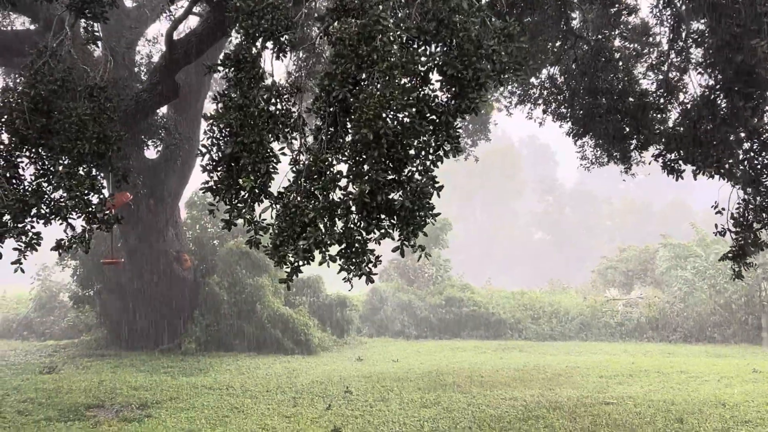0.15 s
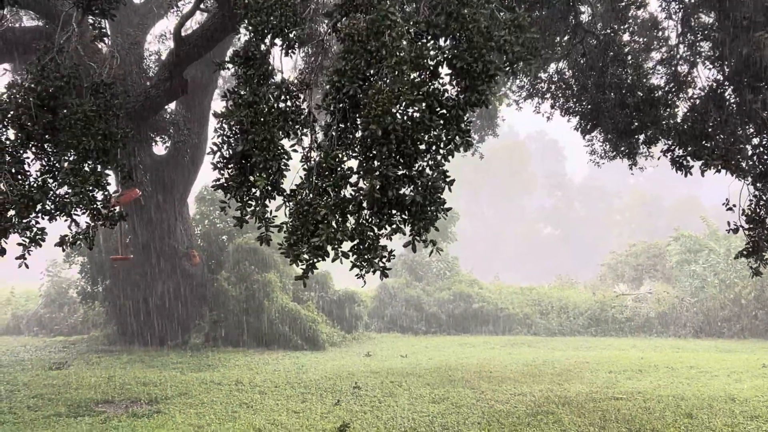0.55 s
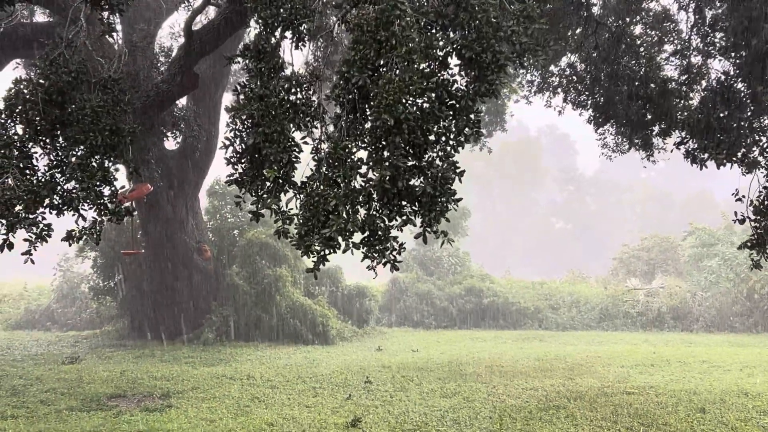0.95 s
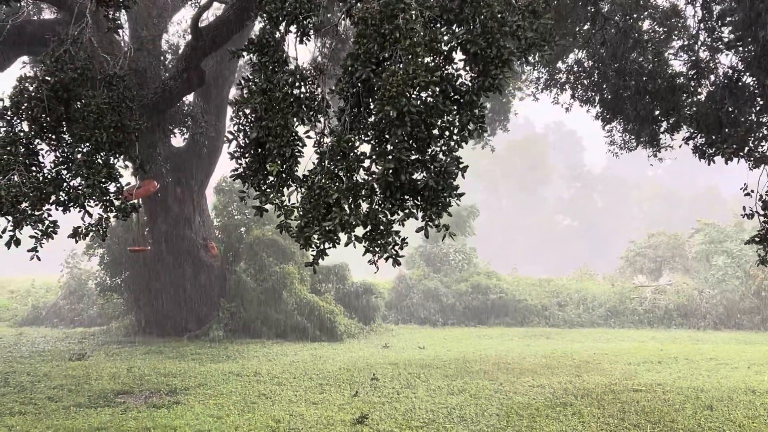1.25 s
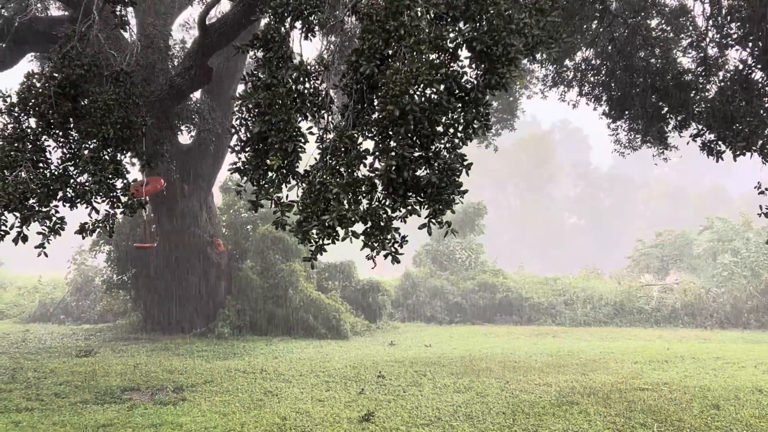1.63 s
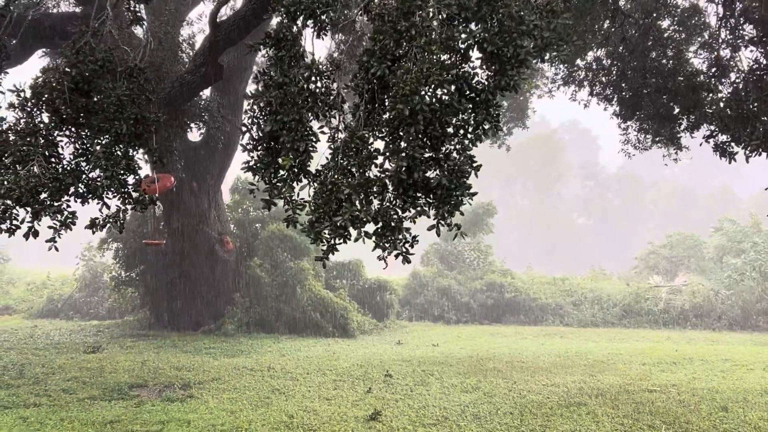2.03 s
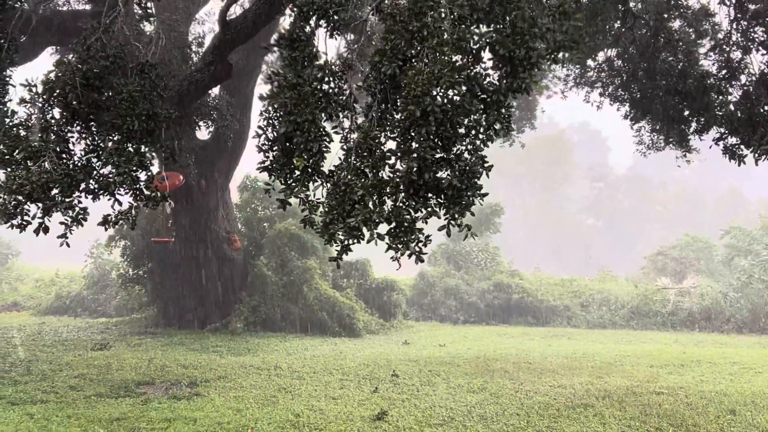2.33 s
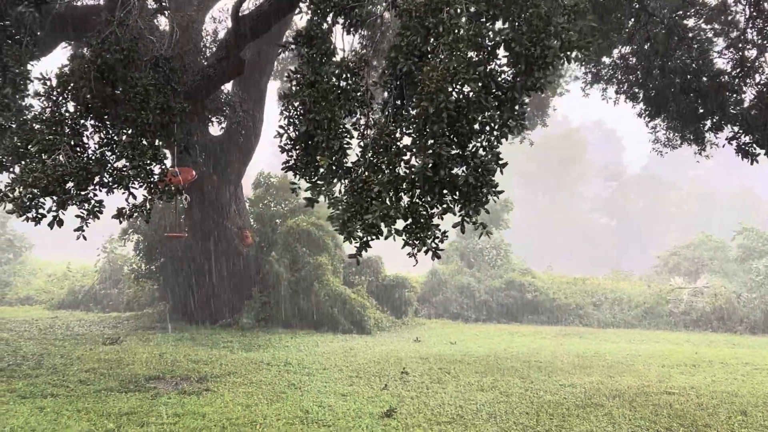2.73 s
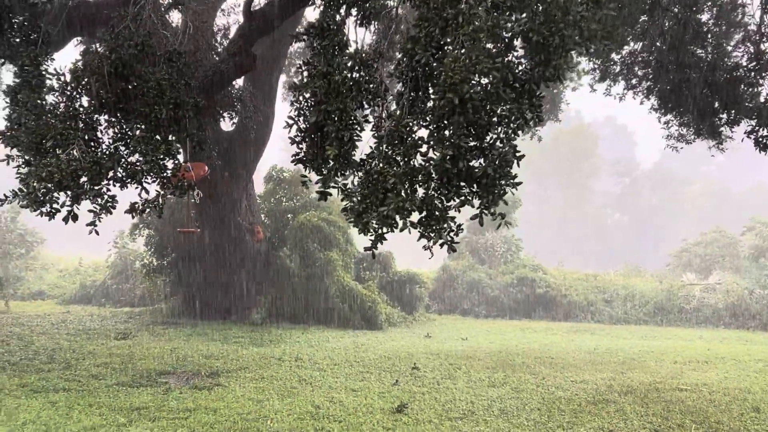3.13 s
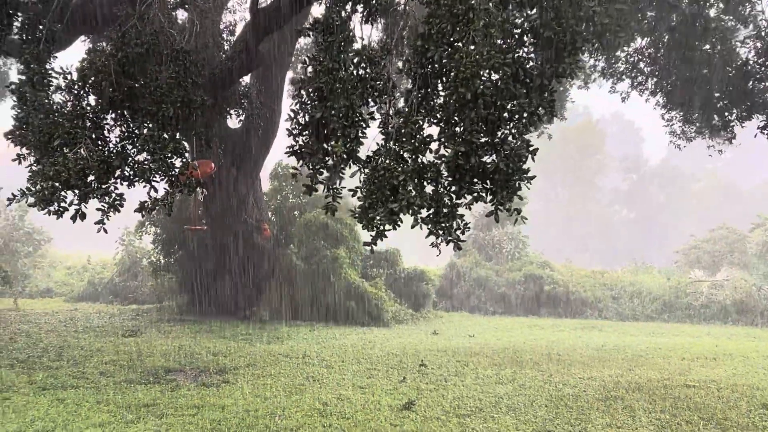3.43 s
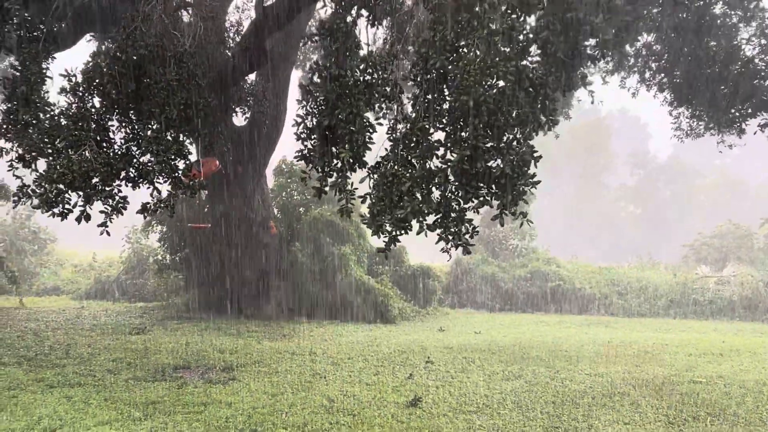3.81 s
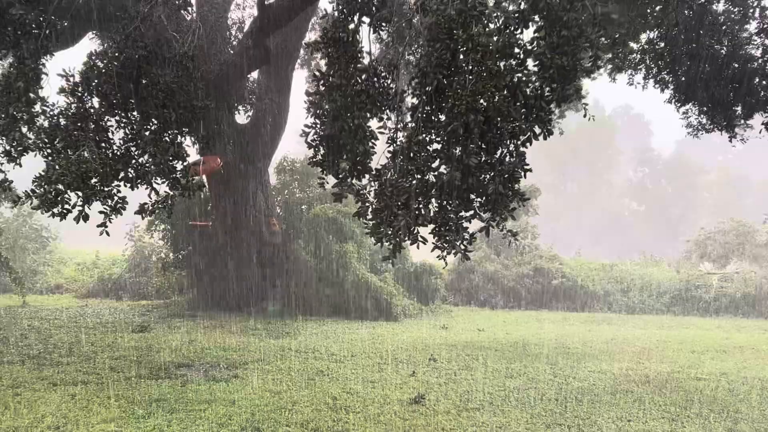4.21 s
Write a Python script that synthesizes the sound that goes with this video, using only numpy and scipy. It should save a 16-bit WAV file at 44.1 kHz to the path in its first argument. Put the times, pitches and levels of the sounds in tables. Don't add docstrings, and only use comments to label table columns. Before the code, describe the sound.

A continuous downpour starts at full strength and is cut off still going. The hiss is full in the middle and softer towards the top, grained with tiny leaf drops, and swells slightly near the end. Close ticks stand out around one second, just before three and just after four. Weak low gusts flutter below. Outdoor garden, small handheld stereo device, wide and diffuse, slightly shifting in colour as it pans.

```python
import sys
import numpy as np
from scipy import signal
from scipy.fft import rfft, irfft, next_fast_len
from scipy.io import wavfile
from scipy.ndimage import uniform_filter1d

SR = 44100
rng = np.random.default_rng(int(sys.argv[2]) if len(sys.argv) > 2 else 0)


def generate_wav(sig):
    pcm = np.round(np.clip(np.atleast_2d(sig).T, -1, 1) * 32767).astype(np.int16)
    wavfile.write(sys.argv[1], SR, pcm)


def natural_amplitude(level_db):
    exponent = np.asarray(level_db, float) / 20
    return 10 ** exponent


N = 192496
FAST = next_fast_len(N, True)
EDGE_HZ = 15740


def evened(x):
    return x / np.sqrt(np.mean(x ** 2) + 1e-20)


def read(hz, points, column=1):
    table = np.array(points)
    return np.interp(np.log(hz + 1), np.log(table[:, 0] + 1), table[:, column])


def curves(rows):
    s, *columns = np.transpose(rows)
    return [np.interp(np.arange(N) / SR, s, c) for c in columns]


def coloured(x, points, skirt_db):
    hz = np.fft.rfftfreq(FAST, 1 / SR)
    octaves_below = np.maximum(np.log2(points[0][0] / (hz + 1)), 0)
    gain = natural_amplitude(read(hz, points) - skirt_db * octaves_below)
    return evened(irfft(rfft(x, FAST) * gain, FAST)[..., :N])


def band(x, low_hz, high_hz):
    sos = signal.butter(3, [low_hz, high_hz], "band", fs=SR, output="sos")
    return evened(signal.sosfilt(sos, x))


def add(mix, s, sound):
    part = mix[round(s * SR):][:len(sound)]
    part += sound[:len(part)]


def far_drops(patchy_db, flicker_db):
    frames = N // 128 + 5
    a, b, c, d, patches = rng.standard_normal((frames, 257, 5)).T
    sheets = evened(uniform_filter1d(patches[0], size=8))
    patches = uniform_filter1d(patches, size=6, axis=0)
    patches = evened(uniform_filter1d(patches, size=30, axis=1))
    z = np.array([a + 1j * b, c + 1j * d]) * natural_amplitude(patchy_db * patches + flicker_db * sheets)
    return evened(signal.istft(z, nperseg=512, noverlap=384)[1][:, :N])


def grains(low_hz, high_hz, per_s, cycles, spread_db, count=12):
    size = natural_amplitude(spread_db * np.minimum(rng.exponential(1, N), 4))
    size *= rng.random(N) < per_s / SR
    size *= rng.choice([-1., 1.], N)
    kind = rng.integers(0, count, N)
    out = np.zeros(N)
    for k, hz in enumerate(np.geomspace(low_hz, high_hz, count)):
        turns = np.arange(256) * hz / SR
        drop = evened(turns * np.exp(-3 * turns / cycles) * np.sin(2 * np.pi * turns))
        out += signal.oaconvolve(size * (kind == k), drop)[:N]
    return evened(out)


def downpour():
    # time in seconds, downpour in dB, nearness of the sheets in dB.
    rain = [(0, -39, -2.5), (.3, -37.5, -1), (1.1, -37.5, 0.5), (1.4, -38, 1.3), (2.2, -37.5, -2),
            (2.6, -38, -0.4), (3.4, -36.5, -0.5), (3.9, -36, -0.9), (4.36, -37.5, 1)]
    # pitch in Hz, level in dB per Hz.
    hiss = [(250, -1), (500, -1), (900, -1), (1400, -1.5), (2000, -3.5), (2800, -5), (3500, -7.5),
            (4300, -7.5), (5400, -9.5), (6300, -10.5), (9000, -13), (12300, -17), (15600, -16)]
    level_db, near_db = curves(rain)
    white = far_drops(patchy_db=0.76, flicker_db=0.6)

    heavier_db = level_db + 37.5
    patter = grains(3030, 9000, per_s=3500, cycles=3., spread_db=2.5)
    patter = natural_amplitude(-12.5 + 1.1 * heavier_db) * patter
    spray = grains(8300, 16500, per_s=900, cycles=6.1, spread_db=4.5)
    spray = natural_amplitude(-13 + 2.1 * heavier_db) * spray
    field = white + (patter + spray) * natural_amplitude([[0], [-6]])

    top = signal.lfilter(*signal.butter(1, 5000, "high", fs=SR), field)
    field = field + (natural_amplitude(near_db + 1.4) - 1) * top
    return natural_amplitude(level_db + 3.5) * coloured(field, hiss, skirt_db=12.0)


def gusts():
    # pitch in Hz, level in dB per Hz.
    gust_colour = [(15, -41), (25, -13.5), (59, 1), (130, -7.5), (170, -31), (290, -120)]
    # time of the top in seconds, level in dB, rise in seconds.
    puffs = [(.25, -42, 0.23), (.8, -42.5, .06), (1.17, -39.5, 0.054), (1.4, -44, .07),
             (1.61, -36.5, 0.036), (1.75, -38, .04), (1.86, -40, .04), (2.04, -41.5, .05), (2.12, -42, .04),
             (2.35, -39, 0.082), (2.47, -40, 0.11), (2.58, -34.5, 0.099), (2.67, -35, .04),
             (2.74, -40, .06), (2.8, -31.5, 0.024), (3.01, -44.5, 0.074), (3.16, -46, .04),
             (3.32, -40.5, .05), (3.4, -38, 0.044), (3.78, -43, .05), (3.88, -48, .05), (4.09, -41, .04),
             (4.31, -35.5, .08)]
    lull_db, upper_rumble_db = -45.5, -46.5
    fall_share = 0.6
    t = np.arange(N) / SR
    power = natural_amplitude(2 * lull_db) * np.ones(N)
    for s, db, rise in puffs:
        width = np.where(t < s, rise, fall_share * rise)
        power = power + natural_amplitude(2 * db) * np.exp(-2 * ((t - s) / width) ** 2)
    a, b = rng.standard_normal((N, 2, 2)).T
    rumble = np.sqrt(power) * coloured(a, gust_colour, skirt_db=12.)
    return rumble + natural_amplitude(upper_rumble_db + 1.37) * band(b, 105, 238.0)


def near_drops():
    # time in seconds, peak in dB, ring in Hz.
    ticks = [(0.1877, -27.5, 4150), (1.055, -30, 3180), (1.1283, -24.5, 4070), (1.145, -27.5, 4410),
             (1.2174, -29, 4730), (1.509, -31, 4710), (2.79, -31, 4570), (2.825, -27.5, 3700),
             (2.8315, -24, 2940), (2.948, -29, 2520), (3.2622, -29, 2900), (3.4557, -26.5, 4300),
             (3.6586, -32, 3560), (4.0064, -26.5, 4570), (4.326, -33, 3370), (4.084, -20.5, 5260)]
    # start in seconds, peak in dB, pitch in Hz.
    thuds = [
        (3.282, -32.5, 316),
        (3.776, -34.5, 319),
    ]
    out = np.zeros(N)
    t = np.arange(1800) / SR
    splashes = band(rng.standard_normal((len(ticks), 1800)), 3200, 14000)
    swell = (t / .0009) ** 4 * np.exp(4 - 4 * t / .0009)
    for (s, db, hz), splash in zip(ticks, splashes):
        splash_db = -8 + 1.6 * max(db + 24.5, 0)
        ring = np.sin(2 * np.pi * hz * t * (1.2 - 70 * t))
        add(out, s + .0004, natural_amplitude(db - 4.5) * swell * (ring + natural_amplitude(splash_db) * splash))
    for s, db, hz in thuds:
        bounce = (t / 0.007) * np.exp(1 - t / 0.0054)
        add(out, s, natural_amplitude(db) * np.sin(2 * np.pi * hz * t) * bounce)
    return out


def ports(shared, unshared):
    # pitch in Hz, likeness 0-1, right leads in radians, left minus right in dB.
    port_rows = [(60, .988, 0, .2), (220, .92, -.1, 2), (285, .52, .5, .6), (600, .55, .4, 1),
                 (850, .3, 1.9, 0), (1800, .02, .2, 1.1), (2800, .76, .8, -1.8), (4650, .98, -.05, 0),
                 (5400, .8, -1.15, 0), (6200, .8, -2.2, -.4), (7600, .78, -4.78, .3), (9600, .8, -4.02, .3),
                 (12400, .94, -3.14, 0), (15700, .78, -2.17, 0)]
    # time in seconds, turn towards the tree as a factor on the cavity.
    pan = [(0, .7), (.6, 1.1), (1.3, .95), (1.9, 1.85), (2.6, .8), (3.6, .5), (4.36, .5)]
    # pitch in Hz, width in Hz,
    # boost in dB.
    left_cavity = [(1360, 65, 2), (1910, 220, 3.5), (2410, 350, 3), (5430, 110, 2.5)]
    # time in seconds, likeness taken off from 10 kHz up (less below; negative adds likeness).
    treble_scatter = [(1.28, .055), (1.36, -.05), (3.6, -.045), (4.0, 0)]
    sway_rad, sway_from_hz = .17, 13000

    hz, t, (left, other) = signal.stft(np.array([shared, unshared]), SR, nperseg=1024, noverlap=768)
    like, lead, balance_db = (read(hz, port_rows, column=k)[:, None] for k in range(1, 4))
    cavity_db = sum(db * np.exp(-((hz - f) / width) ** 2) for f, width, db in left_cavity)[:, None]
    turn, scatter = (np.interp(t, *np.transpose(rows)) for rows in (pan, treble_scatter))
    like = np.clip(like - scatter * np.clip(hz / 10000, 0, 1)[:, None] ** 2, 0, 1)

    sway = evened(uniform_filter1d(rng.standard_normal(len(t)), size=7)) + 4 * scatter + .1
    treble = np.clip((hz[:, None] - sway_from_hz) / (EDGE_HZ - sway_from_hz), 0, 1)
    lead = lead + sway_rad * sway * treble

    right = like * np.exp(1j * lead) * left + np.sqrt(1 - like ** 2) * other
    left = left * natural_amplitude(balance_db / 2 + cavity_db * turn)
    pair = np.array([left, right * natural_amplitude(-balance_db / 2)])
    return signal.istft(pair, SR, nperseg=1024, noverlap=768)[1][:, :N]


def scene():
    shared, unshared = downpour() + gusts()
    near = near_drops()
    direct = natural_amplitude(-11) * near
    return ports(shared + near, unshared + 0.55 * near) + direct


def joint_stereo(x, from_hz, mid_gap_db, side_gap_db, attack_crest, size=16, order=20):
    pair = np.pad([x[0] + x[1], x[0] - x[1]], ((0, 0), (order, 0))) / 2
    hz, t, z = signal.stft(pair, SR, window="cosine", nperseg=2048, noverlap=1024)
    edges = np.arange(0, len(hz), size)
    power = np.add.reduceat(abs(z) ** 2 + 1e-20, edges, axis=1)
    lead_db = 10 * np.log10(np.divide(*power))
    keep = np.array([lead_db > -mid_gap_db, lead_db < side_gap_db])
    keep = keep.repeat(size, axis=1)[:, :len(hz)]
    treble = abs(band(x[0], 5000, 15000))
    centres = (t * SR).astype(int)
    peaks = np.array([treble[max(i - 800, 0):i + 800].max(initial=0) for i in centres])
    keep = keep | (hz < from_hz)[:, None] | (peaks > attack_crest)
    z = z * keep
    mid, side = signal.istft(z, SR, window="cosine", nperseg=2048, noverlap=1024)[1][:, order:order + N]
    return np.array([mid + side, mid - side])


def roll_off(x):
    return signal.sosfilt(signal.butter(12, 17110, fs=SR, output="sos"), x)


def record(dry):
    dry = signal.lfilter(*signal.butter(2, 37, "high", fs=SR), dry)
    edge = signal.firwin(1023, EDGE_HZ, window=("kaiser", 10), fs=SR)
    limited = signal.oaconvolve(dry, edge[None], "same")
    return roll_off(limited)


dry = scene()
out = record(dry)
generate_wav(out)
```